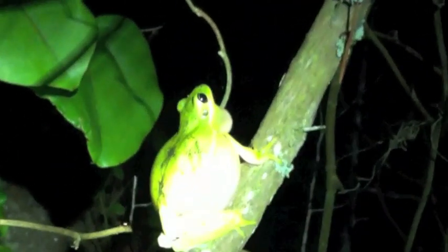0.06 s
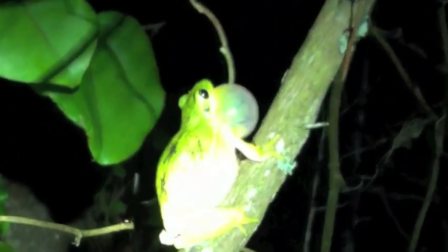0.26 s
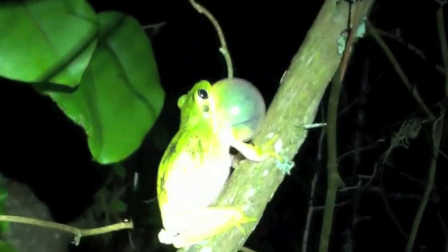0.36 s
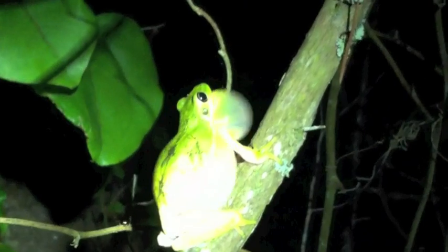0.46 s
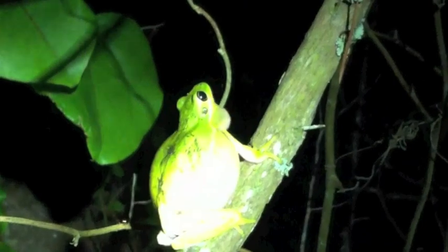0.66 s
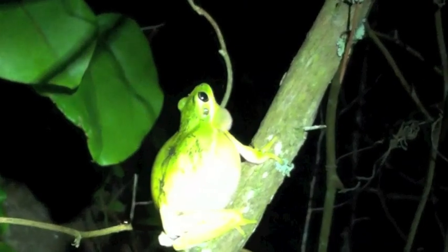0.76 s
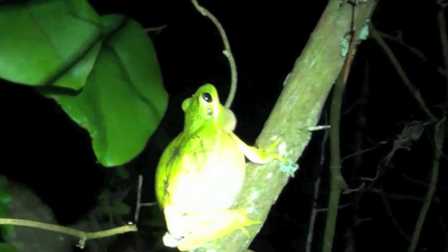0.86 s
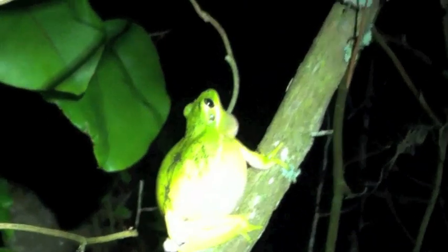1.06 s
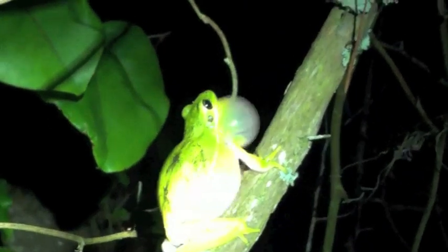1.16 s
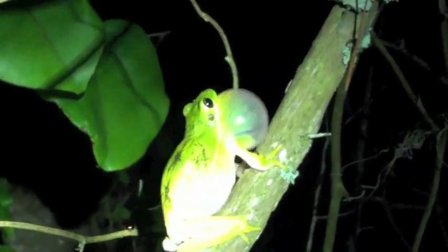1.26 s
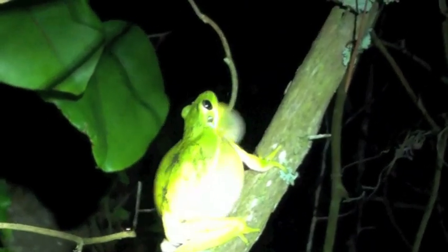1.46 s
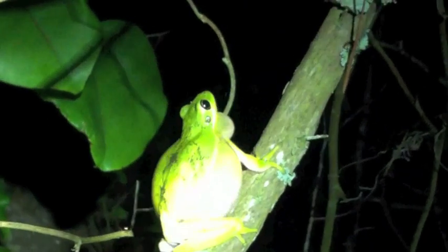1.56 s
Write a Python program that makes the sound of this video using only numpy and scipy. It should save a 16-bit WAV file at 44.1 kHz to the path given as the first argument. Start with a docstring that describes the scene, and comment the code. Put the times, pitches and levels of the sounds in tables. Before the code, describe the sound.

Two short, buzzy tree frog honks nearby, with other frogs calling farther off at night.

```python
"""Night opens on the blur of a far frog chorus, with neighbours calling from the trees around.
At 0.2 s a tree frog close by gives a short, harsh honk: its larynx hums and fires a pulse on every
third cycle. The pulses stutter in, lock to a buzz that rings a rising throat resonance, and stutter out.
Neighbours answer, the near frog honks again at 1.2 s, and a last neighbour follows over the chorus."""
import sys
import numpy as np
from scipy import signal
from scipy.io import wavfile
from scipy.ndimage import uniform_filter1d

SR = 44100
rng = np.random.default_rng(int(sys.argv[2]) if len(sys.argv) > 2 else 0)


def wav_record(signal):
    """Record a signal, one row per channel, as 16-bit PCM in the file named by sys.argv[1]."""
    frames = np.transpose(np.atleast_2d(signal))
    bounded = np.clip(frames, -1, 1)
    # unit amplitude maps onto the largest positive 16-bit level
    quanta = np.round(bounded * 32767).astype(np.int16)
    wavfile.write(sys.argv[1], SR, quanta)


N = 70560


def amp(db):
    """Amplitude ratio of a level in decibels."""
    return 10 ** (np.asarray(db) / 20)

def unit_rms(x):
    """Normalisation to unit mean power."""
    return x / np.sqrt(np.mean(x ** 2) + 1e-20)

def level_at(spectrum, hz):
    """Interpolation of a spectrum on a log-frequency axis."""
    points_hz, level_db = np.transpose(spectrum)
    return np.interp(np.log(hz + 1), np.log(points_hz + 1), level_db)

def add(mix, start_s, sound):
    """Superposition: a sound sums into the mix from start_s on."""
    at = round(start_s * SR)
    sound = sound[max(-at, 0):]
    part = mix[max(at, 0):][:len(sound)]
    part += sound[:len(part)]

def colour(x, spectrum, size=4096):
    """Minimum-phase filter: the phase follows from the log gain by the Hilbert transform."""
    log_gain = np.log(amp(level_at(spectrum, abs(np.fft.fftfreq(size, 1 / SR)))))
    taps = np.fft.ifft(np.exp(np.conj(signal.hilbert(log_gain)))).real
    return signal.fftconvolve(x, taps[:size // 2])[:len(x)]

def resonate(x, hz, width_hz):
    """Damped resonator of unit peak gain whose natural frequency may glide."""
    phasor = np.exp(2j * np.pi * np.cumsum(hz * np.ones(len(x))) / SR)
    pole = np.exp(-np.pi * width_hz / SR)
    return 2 * (phasor * signal.lfilter([1 - pole], [1, -pole], x / phasor + 1e-18)).real

def impulses(t, times, sizes, reach=8):
    """Band-limited impulses: windowed sincs keep their timing between samples."""
    at = np.round(times * SR).astype(int)[:, None] + np.arange(-reach, reach + 1)
    offset = at - times[:, None] * SR
    shapes = sizes[:, None] * np.sinc(offset) * np.sinc(offset / reach)
    train = np.zeros(len(t))
    np.add.at(train, np.clip(at + reach, 0, len(t) - 1), shapes)
    return train

# Spectrum of the far chorus and night air: frequency_hz, relative_density_db
CHORUS_SPECTRUM = [(20, -68), (55, -75.5), (85, -56), (125, -32), (180, -24.5), (300, -30.5), (480, -25),
                   (680, -30.5), (860, -2.5), (1150, -8), (1550, -13), (2050, -3.5), (2500, -6.5),
                   (3150, 3), (4000, -14.5), (5900, -11), (7800, -27), (9000, -36), (11000, -70),
                   (16000, -68)]
def far_chorus(level_db=-37, patch_db=3, size=2048):
    """Incoherent summation: countless far frogs blur into noise that swells in patches."""
    hz, frames = np.fft.rfftfreq(size, 1 / SR), N // (size // 4) + 5
    real, imag, patches = rng.standard_normal((3, frames, len(hz)))
    patches = uniform_filter1d(patches, size=7, axis=0)  # smooth in time
    patches = unit_rms(uniform_filter1d(patches, size=8, axis=1))  # and in frequency
    spectra = (real + 1j * imag) * amp(level_at(CHORUS_SPECTRUM, hz) + patch_db * patches)
    wash = signal.istft(spectra.T, nperseg=size, noverlap=size * 3 // 4)[1][:N]
    return amp(level_db) * unit_rms(wash)

def tree_echoes(x, t60_s=.2, delay_s=.004, spacing=16):
    """Reverberation: dense random reflections from trunks and leaves decay exponentially."""
    at = np.arange(0, SR // 2, spacing)
    reflections = rng.choice([-1., 1.], len(at)) * amp(-60 * at / SR / t60_s)
    taps = np.zeros(SR // 2 + spacing)
    taps[at + rng.integers(0, spacing, len(at))] = reflections
    taps = np.pad(taps / np.linalg.norm(taps), (round(delay_s * SR), 0))
    return signal.fftconvolve(x, taps)[:len(x)]

def larynx_hum(periods):
    """Harmonic oscillation: the larynx completes three cycles in each pulse period."""
    return np.cos(2 * np.pi * 3 * periods)

# Spectrum of a pulse's dull body: frequency_hz, gain_db
BODY_SPECTRUM = [(30, -48.5), (150, -39.5), (450, -49), (680, -20), (850, 2.5), (1200, 5), (1550, -3),
                 (1850, -3.5), (2150, -4), (2450, 2), (2750, -0.5), (3050, 3.5), (3650, 0.5), (4100, -8.5),
                 (5000, -6.5), (9000, -66.5)]
# Spectrum of its sharp snap: frequency_hz, gain_db
SNAP_SPECTRUM = [(100, -65), (2800, -27.5), (4200, 0), (6000, 2.5), (8100, -3), (8550, -8), (9200, -21.5),
                 (10000, -8), (10700, -23.5), (12000, -41.5), (15000, -69)]
# Upper resonances of the vocal sac: frequency_hz, bandwidth_hz, gain_db
SAC_MODES = [(4640, 420, 5), (5320, 190, 2.5), (6280, 510, 2), (6850, 260, 3), (7980, 450, 3.5)]
def vocal_tract(pulses, snaps, throat_hz, width_hz, throat_db, sac_tuning=1):
    """Source and filter: pulses ring the throat, and their sharp double edges ring the sac."""
    body, edge = colour(pulses, BODY_SPECTRUM), colour(snaps, SNAP_SPECTRUM)
    edge = edge + amp(-6.5) * np.roll(edge, -round(.00055 * SR))  # a weaker edge comes just ahead
    sac = sum((-1) ** k * amp(db) * resonate(edge, hz * sac_tuning, bandwidth_hz)
              for k, (hz, bandwidth_hz, db) in enumerate(SAC_MODES))
    return body + amp(throat_db) * resonate(body, throat_hz, width_hz) + sac

# Colouring by distance: frequency_hz, gain_db
DISTANCE_RESPONSE = [(30, -22), (300, -24), (700, -6.5), (880, -6.5), (1200, 1.5), (1500, -7.5),
                     (2050, 6.5), (2500, -1), (3200, 2.5), (6000, -2.5), (8000, -6), (10000, -6.5)]
# Calls from the trees: start_s, length_s, level_db, base_rate_hz, drop_hz, throat_hz, hum_db, snap_db
NEIGHBOUR_CALLS = [ (-.04, 0.12, -38.5, 335.4, 9, 3210, -14, -2.5),
                   (0.046, 0.13, -36, 287.7, 12.4, 2830, -5.5, -2.5),
                   (.28, 0.14, -32, 286.9, 21.6, 3020, -3.5, 4.5),
                   (0.448, .14, -38, 308, 14.5, 3320, -14, -0.5), (.60, 0.089, -42, 312, 11, 3090, -7, -10),
                   (0.666, 0.17, -37, 285.7, 20, 3004, -6, 0.5),
                   (0.868, 0.17, -36.5, 317, 13, 3180, -11, -5.5),
                   (0.943, 0.19, -33, 294.3, 20.4, 3120, -3, 3.5),
                   (1.288, .175, -36.5, 287, 15.1, 2930, -4.5, 0.5),
                   (1.524, 0.13, -32, 318.5, 6.7, 3160, -12.5, -10)]
def neighbour_call(start_s, length_s, level_db, base_rate_hz, drop_hz, throat_hz, hum_db, snap_db):
    """Multipath propagation: the trees smear the pulses of a farther frog whose pitch sags."""
    sag_s, attack_s, release_s, hum_attack_s = .053, .011, .042, .013
    count, jitter_periods = 90, .006
    t = np.arange(SR // 2) / SR
    periods = np.cumsum(base_rate_hz + drop_hz * np.exp(-t / sag_s)) / SR
    times = np.interp(np.arange(count) + jitter_periods * rng.standard_normal(count), periods, t)
    sizes = np.clip(times / attack_s, 0, 1) * np.clip((length_s - times) / release_s, 0, 1)
    pulses = impulses(t, times, sizes)
    buzz = vocal_tract(pulses, pulses * amp(snap_db), throat_hz, width_hz=356, throat_db=13)
    buzz = colour(buzz, DISTANCE_RESPONSE)
    buzz = buzz + amp(-3) * tree_echoes(buzz)
    swell = np.minimum(t / hum_attack_s, 1) * np.maximum(1 - t / length_s, 0) ** .6
    hum = swell * larynx_hum(periods)
    hum = hum + amp(-9.5) * tree_echoes(hum)
    call = unit_rms(buzz) + amp(hum_db) * unit_rms(hum)
    return start_s, amp(level_db) * call * np.sqrt(length_s / t[-1])

def stutter(growth, step_db, count):
    """Geometric spacing: offsets (periods) and levels (dB) of pulses drifting away from the buzz."""
    k = np.arange(count) + 1
    return np.cumsum(growth ** k), step_db * k ** 2

def near_pulses(t, rate_hz, count, length_s):
    """Jitter and shimmer: a pulse train is regular in the middle, loose and raspy at both ends."""
    settle_s, peak_s, closing_db, shimmer_db = .018, .044, 3, .25
    lead, lead_db = stutter(growth=1.62, step_db=-2.1, count=2)
    trail, trail_db = stutter(growth=1.27, step_db=-1.05, count=4)
    times = np.r_[-lead[::-1], np.arange(count), count - 1 + trail] / rate_hz
    elapsed_s = np.clip(times, 0, length_s)
    looseness = np.maximum(np.exp(-(elapsed_s / settle_s) ** 4), times > length_s)
    jitter, shimmer = rng.standard_normal((2, len(times)))
    times = times + jitter * (.0015 + .08 * looseness) / rate_hz
    rise_db = -4 * (1 - elapsed_s / peak_s) ** 2
    fall_db = -5 * abs((elapsed_s - peak_s) / (length_s - peak_s)) ** 1.8
    stutter_db = np.r_[lead_db[::-1], np.zeros(count), closing_db + trail_db]
    sizes = amp(np.where(elapsed_s < peak_s, rise_db, fall_db) + stutter_db + shimmer_db * shimmer)
    rasp_envelope = np.interp(t, times, sizes * amp(-26 + 13 * looseness), left=0, right=0)
    rasp = rasp_envelope * np.sqrt(rate_hz / SR) * rng.standard_normal(len(t))
    return impulses(t, times - t[0], sizes) + rasp

def near_hum(t, rate_hz, length_s):
    """Amplitude and phase modulation: the hum starts early and sharp, swells, and outlasts the pulses."""
    lead_s, lag_s, peak_fraction, sharpness, settle_s = .026, .028, .41, .015, .012
    progress = np.clip((t + lead_s) / (lead_s + length_s + lag_s), 0, 1)
    swell = abs(np.sin(np.pi * progress ** (np.log(.5) / np.log(peak_fraction))))
    phase_delay_s = sharpness * settle_s * np.exp(-np.maximum(t, -settle_s) / settle_s)
    return swell * larynx_hum(rate_hz * (t - phase_delay_s))

# Honks of the near frog: buzz_start_s, level_db, pulse_rate_hz
NEAR_CALLS = [(.2228, 0, 304.25), (1.1642, -.4, 304.1)]
def near_call(buzz_start_s, level_db, rate_hz, count=42):
    """Time-varying resonance: the throat's pitch rises as the sac swells; the sac's modes sink late."""
    margin_s, inflate_s, snap_peak_s, sag_s = .05, .039, .088, .125
    length_s = (count - 1) / rate_hz
    t = np.arange(SR // 3) / SR - margin_s  # zero where the steady buzz begins
    pulses = near_pulses(t, rate_hz, count, length_s)
    snap_db = 2 - 7 * np.minimum(((t - snap_peak_s) / .05) ** 2, 1) - .5 * (t > length_s)
    rise_start_s = -1.62 / rate_hz  # about the last opening stutter
    throat_hz = 3220 - 664 * np.exp(-np.maximum(t, rise_start_s) / inflate_s)
    sac_tuning = 1 - .051 * np.clip(t / sag_s, 0, 1) ** 8
    buzz = vocal_tract(pulses, pulses * amp(snap_db), throat_hz,
                       width_hz=282, throat_db=19.5, sac_tuning=sac_tuning)
    call = unit_rms(buzz) + amp(-9) * unit_rms(near_hum(t, rate_hz, length_s))
    return buzz_start_s - margin_s, amp(level_db - 15) * call * np.sqrt(length_s * SR / len(t))

def scene():
    """Direct and reverberant sound: the near frog, almost dry, stands out from neighbours and chorus."""
    around, near = far_chorus(), np.zeros(N)
    for call in NEAR_CALLS:
        add(near, *near_call(*call))
    for call in NEIGHBOUR_CALLS:
        add(around, *neighbour_call(*call))
    return (around + near + amp(-22) * tree_echoes(near))[None]

def record(dry, cutoff_hz=12500):
    """Band limiting: a linear-phase low-pass filter removes the highest treble."""
    taps = signal.firwin(511, cutoff_hz, window=("kaiser", 9), fs=SR)
    return signal.oaconvolve(dry, taps[None], "same")


dry = scene()
out = record(dry)
wav_record(out)
```